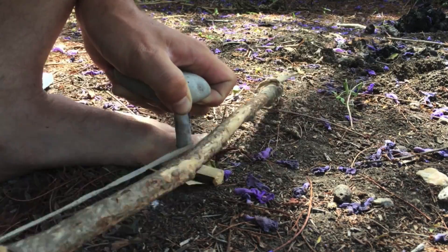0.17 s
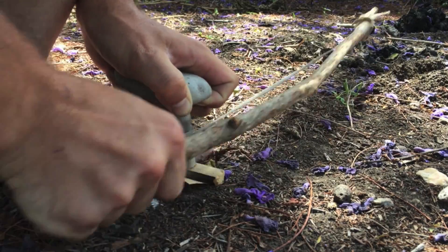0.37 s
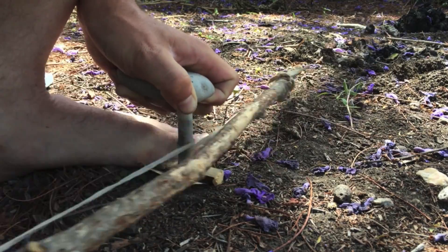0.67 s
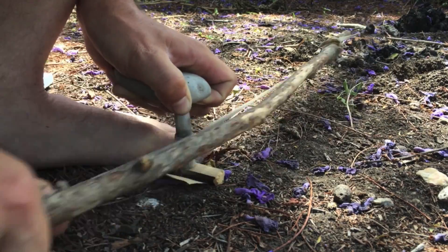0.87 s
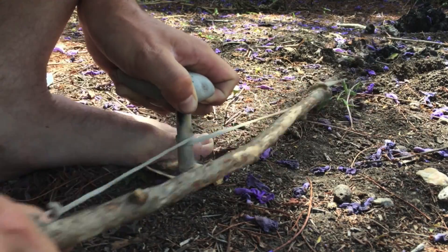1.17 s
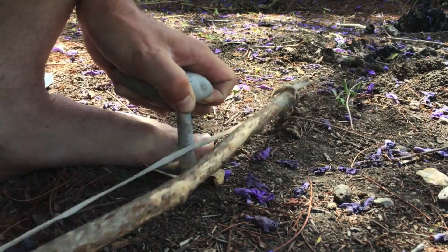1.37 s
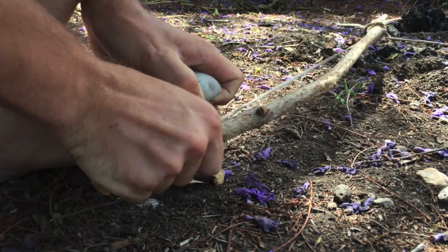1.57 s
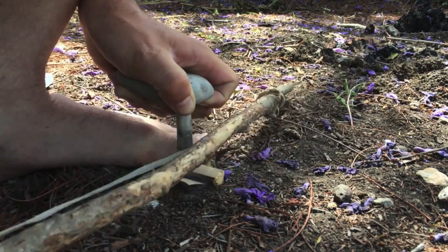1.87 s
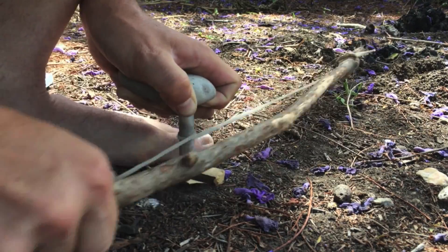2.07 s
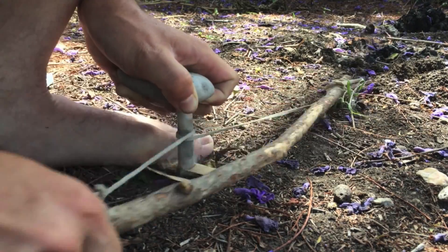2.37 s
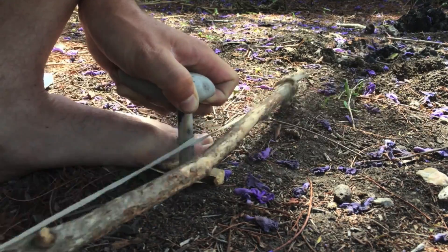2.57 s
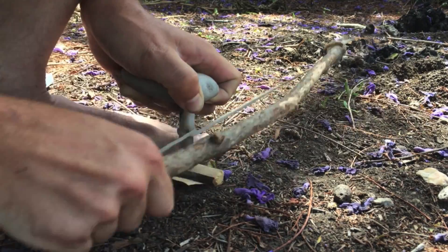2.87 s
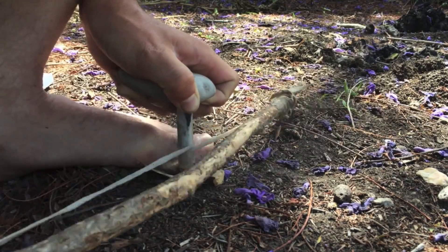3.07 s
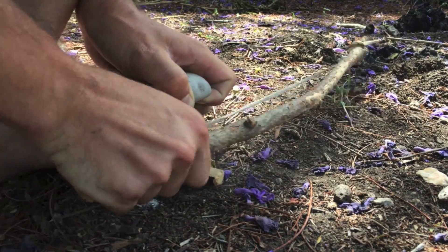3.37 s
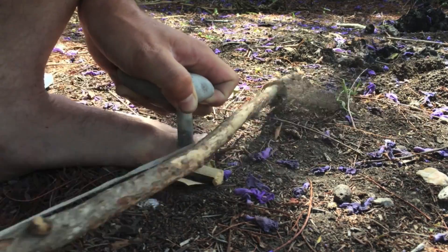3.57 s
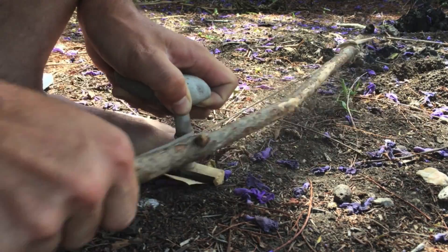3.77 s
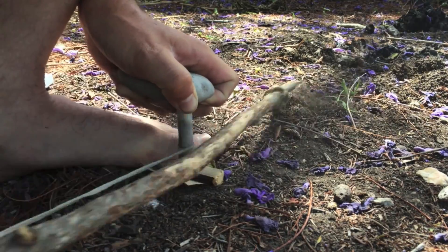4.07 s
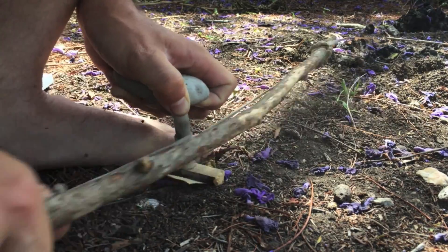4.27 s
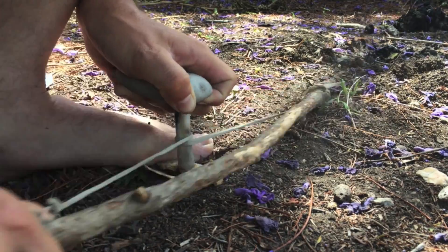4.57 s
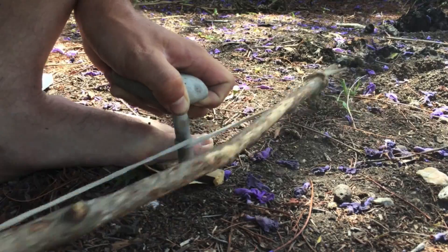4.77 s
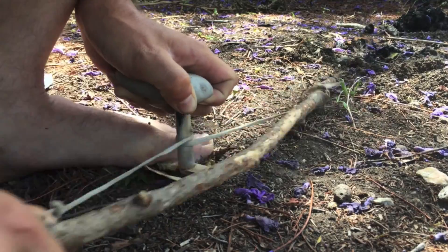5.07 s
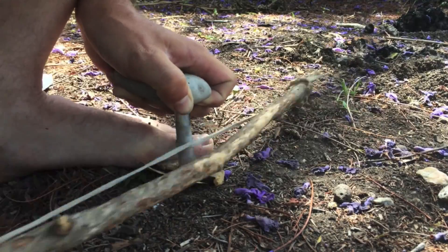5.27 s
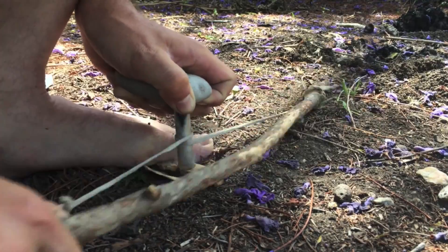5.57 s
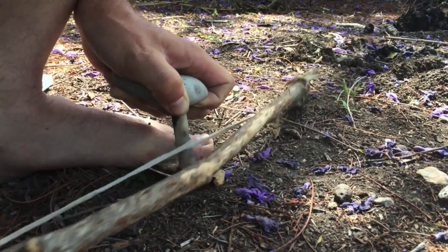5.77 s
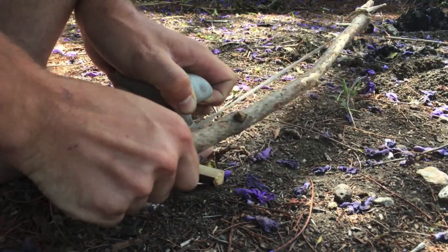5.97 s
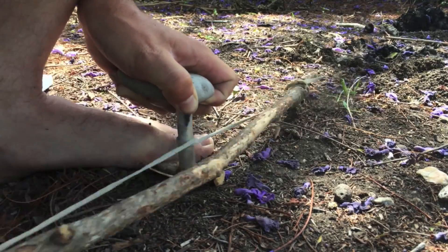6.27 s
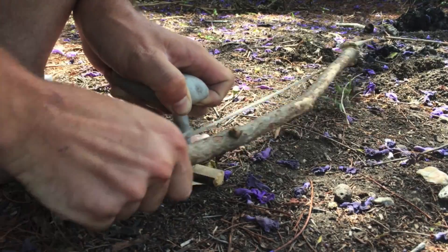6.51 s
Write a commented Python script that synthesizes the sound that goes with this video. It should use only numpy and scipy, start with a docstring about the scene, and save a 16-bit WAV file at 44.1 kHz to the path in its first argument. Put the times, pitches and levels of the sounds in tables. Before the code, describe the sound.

A bow drill spins a wooden spindle in a softwood board, close to the microphone. Fast, even strokes, three or four a second, each give a dry rasp over a low purr or rumble. Grit crunches, the board creaks and the cord ticks now and then. From about halfway, short high squeaks grow louder and more crowded. Behind it is quiet outdoor air with a faint distant hum.

```python
"""Outdoors on bare ground, close to a bow drill spinning its spindle in a softwood board.
Over still air and a distant hum, each stroke rasps in the socket and shakes the board:
a low purr on the pull, a rumble on the push. Grit catches, the board creaks, the cord ticks.
As the socket heats and glazes, the spindle sticks and slips in louder, more crowded squeaks."""
import sys
import numpy as np
from scipy import signal
from scipy.fft import rfft, irfft, next_fast_len
from scipy.io import wavfile

SR = 44100
rng = np.random.default_rng(int(sys.argv[2]) if len(sys.argv) > 2 else 0)


def file_out(sig):
    """Save sig as 16-bit WAV at sys.argv[1]."""
    # one column per channel
    cols = np.atleast_2d(sig).T
    # limit, then scale
    lim = np.clip(cols, -1, 1)
    pcm = np.round(lim * 32767).astype(np.int16)
    wavfile.write(sys.argv[1], SR, pcm)


N = 292824
TIME = np.arange(N) / SR


def from_db(db):
    """Decibels to gain."""
    return 10 ** (np.asarray(db) / 20)


def unit_rms(x):
    """Scale to rms 1."""
    return x / np.sqrt(np.mean(x ** 2) + 1e-20)


def automation(rows):
    """One curve per column from breakpoints (time_s, values...)."""
    times, *columns = np.transpose(sorted(map(tuple, rows)))
    return [np.interp(TIME, times, column) for column in columns]


def eq_gain(spectrum, hz):
    """Gain of a (freq_hz, level_db) curve, read on a log-frequency axis."""
    freqs, db = np.transpose(spectrum)
    return from_db(np.interp(np.log(hz + 1e-3), np.log(freqs), db, left=-90, right=-90))


def drift(rate_hz):
    """Smooth random modulation that moves at about this rate; rms 1."""
    step = 6  # samples per control point
    size = next_fast_len(N // step + 2)
    hz = np.arange(size // 2 + 1) * SR / (step * size)
    slow = irfft(rfft(rng.standard_normal(size)) / (1 + (hz / rate_hz) ** 2) ** 2, size)
    return np.interp(np.arange(N) / step, np.arange(size), unit_rms(slow))


def coloured_noise(spectrum):
    """Noise shaped by an EQ curve; rms 1."""
    size = next_fast_len(N)
    hz = np.arange(size // 2 + 1) * SR / size
    return unit_rms(irfft(rfft(rng.standard_normal(size)) * eq_gain(spectrum, hz), size)[:N])


def resonate(x, hz, width_hz):
    """One resonance with unit gain at its peak."""
    r = np.exp(-np.pi * width_hz / SR)
    feedback = [1, -2 * r * np.cos(2 * np.pi * hz / SR), r * r]
    return signal.lfilter(np.array([1, 0, -1]) * (1 - r * r) / 2, feedback, x)


def band(x, low_hz, high_hz):
    """Gentle band-pass."""
    return signal.sosfilt(signal.butter(2, [low_hz, high_hz], "band", fs=SR, output="sos"), x)


def swell(centre_s, width_s, skirt=0, hold_s=0):
    """Sample indices and shape of a bell envelope, with an optional long skirt and flat top."""
    reach_s = 6 * width_s + hold_s / 2
    at = np.arange(max(int((centre_s - reach_s) * SR), 0), min(int((centre_s + reach_s) * SR), N))
    away = np.maximum(np.abs(TIME[at] - centre_s) - hold_s / 2, 0) / width_s
    return at, (1 - skirt) * .5 ** ((2 * away) ** 2) + skirt * np.exp(-away)


def bursts(spectrum, rows):
    """A bell of coloured noise for each (centre_s, length_s, level_db)."""
    out, noise = np.zeros(N), coloured_noise(spectrum)
    for centre_s, length_s, db in rows:
        at, bell = swell(centre_s, length_s)
        burst = noise[at] * bell
        out[at] += from_db(db) * burst * np.sqrt(np.sum(bell ** 2) / np.sum(burst ** 2))
    return out


def rubbed_mode(hz, width_hz, flutter_db):
    """Uneven friction keeps a mode ringing along a pitch curve, restless in level and phase; rms 1."""
    ringing = drift(width_hz) + 1j * drift(width_hz)
    flutter = from_db(flutter_db * np.tanh(drift(150)))
    return unit_rms(np.real(ringing * flutter * np.exp(2j * np.pi * np.cumsum(hz) / SR)))


# Tone of the still air: freq_hz, level_db
AIR_SPECTRUM = [(15, -32), (25, -12), (50, -4.5), (100, 2.5), (150, -5.5), (260, -11), (510, -16),
                (700, -20.5), (1050, -20.5), (1620, -24.5), (3500, -36), (7100, -37.5), (12800, -40),
                (15500, -62)]
# Fader moves of the distant hum: time_s, level_db
HUM_FADER = [(0, -45.5), (.55, -42.5), (.85, -58), (1.3, -50), (2.3, -56), (3.3, -55), (4.3, -72),
             (6.64, -55)]


def background(air_db=-52, hum_hz=69.7, waver_hz=2.36, waver_db=2.5, hum_trim_db=-4.5):
    """A bed of still air, with a distant low hum that wavers and fades unevenly."""
    pitch_hz = hum_hz + waver_hz * drift(6.3)
    hum = np.sqrt(2) * np.sin(2 * np.pi * np.cumsum(pitch_hz) / SR)
    air = from_db(air_db) * coloured_noise(AIR_SPECTRUM)
    hum_db = automation(HUM_FADER)[0] + hum_trim_db + waver_db * drift(1.9)
    return air + from_db(hum_db) * hum


def outdoors(x, t60_s=0.29, wet_db=-36, predelay_s=.004):
    """Trunks and ground scatter back a faint, dull tail."""
    t = TIME[:SR // 2]
    tail = band(rng.standard_normal(len(t)), low_hz=300, high_hz=4580)
    tail *= from_db(-60 * t / t60_s) * (t > predelay_s)
    return x + from_db(wet_db) * signal.fftconvolve(x, tail / np.sqrt(np.sum(tail ** 2)))[:N]


# Cues for the cord snapping taut: start_s, level_db
CORD_SNAPS = [(0.2798, -53), (0.848, -56), (1.997, -39.5), (2.6237, -51), (2.734, -28), (4.2637, -40),
              (4.7778, -36), (5.7674, -31)]


def cord_ticks(decay_s=0.0031, trim_db=-3):
    """The cord snaps taut on the spindle with a dry tick, mostly as the bow turns round."""
    impulses = np.zeros(N)
    for start_s, db in CORD_SNAPS:
        impulses[int(start_s * SR)] = from_db(db + trim_db)
    envelope = signal.lfilter([1], [1, -np.exp(-1 / (decay_s * SR))], impulses + 1e-18)
    return envelope * unit_rms(band(rng.standard_normal(N), low_hz=900, high_hz=13300))


# Cues for the spindle hitting the socket wall: centre_s, level_db
WALL_KNOCKS = [(.4123, -39), (.4454, -37), (.484, -40), (.946, -32.5), (1.0105, -40), (1.5238, -34),
               (1.5604, -28.5), (1.589, -37.5), (1.6278, -36), (2.452, -40.5), (3.345, -32), (4.907, -35),
               (5.4194, -28.5), (5.913, -32)]
# Dull wooden body of a knock: freq_hz, level_db
KNOCK_SPECTRUM = [(130, -48), (220, -19), (350, 5), (600, -14.5), (900, -15)]


def knocks(length_s=0.005, trim_db=-3.5):
    """The spindle thumps against the wall of its socket, mostly on the push."""
    return bursts(KNOCK_SPECTRUM, [(s, length_s, db + trim_db) for s, db in WALL_KNOCKS])


# Short hollow creaks of the board under load: centre_s, level_db, pitch_hz
BOARD_CREAKS = [(.147, -44, 661), (1.84, -41.5, 704), (2.485, -38.5, 660), (2.521, -39, 681),
                (3.08, -35.5, 1220), (3.869, -41.5, 916), (4.694, -37, 741.6), (5.163, -36.5, 675),
                (5.447, -34, 958), (6.143, -38, 686), (6.206, -38, 710)]


def creaks(length_s=.008, jitter=0.084, trim_db=-3.0):
    """The spindle grabs for a few cycles and rocks the board at a low, unsteady pitch."""
    out, unsteady = np.zeros(N), 1 + jitter * drift(302)
    for centre_s, db, hz in BOARD_CREAKS:
        at, bell = swell(centre_s, length_s)
        tone = np.sqrt(2) * np.sin(2 * np.pi * np.cumsum(hz * unsteady[at]) / SR)
        out[at] += from_db(db + trim_db) * bell * tone
    return out


def fine_grit(push_speed, top_rate_per_s=14, length_s=0.0035, level_db=-36.5, spread_db=2, board_db=-5):
    """Cues for small random catches, far more frequent when the push is fast."""
    tries = 160
    position, chance, softness = rng.random((tries, 3)).T
    times = position * TIME[-1]
    rate_per_s = top_rate_per_s * np.interp(times, TIME, push_speed) ** 5
    caught = chance < rate_per_s * TIME[-1] / tries
    levels_db = level_db - spread_db * (2 * softness - 1)
    return [(s, length_s, db, board_db) for s, db in zip(times[caught], levels_db[caught])]


# Grit catching in the socket: centre_s, length_s, level_db, board_send_db
GRIT_CATCHES = [(.3808, 0.0027, -29.5, 1.5), (.4123, 0.004, -35, -4), (.946, 0.0026, -29, -5),
                (.976, 0.0039, -36, -0.5), (1.19, 0.0021, -34.5, -8), (1.522, 0.01, -32, -10),
                (1.631, 0.0065, -35, -5.5), (1.7715, .0016, -33, -18), (1.8844, 0.0019, -33.5, 1.5),
                (2.0751, .0021, -25, -19), (2.0816, 0.0054, -30, -2), (2.109, 0.0026, -22.5, -7),
                (2.117, 0.0068, -23, -1.5), (2.1467, 0.0012, -22.5, -6), (2.1803, 0.00093, -25.5, -4),
                (2.219, 0.011, -32.5, -8.5), (2.3293, 0.0035, -42.5, -10), (2.4522, 0.0036, -20.5, -1.5),
                (2.5454, 0.0029, -34.5, -18), (3.3118, .004, -28.5, -1), (3.3408, 0.0018, -22.5, -17),
                (3.345, 0.00095, -19.5, 2), (3.5196, .004, -39, -7), (3.8707, .0011, -30, -1),
                (4.3154, .0038, -29, -27), (4.3435, .0041, -29, -20), (4.9084, .0031, -30, -5.5),
                (4.9267, 0.0025, -31, -4), (5.4147, .0017, -19, -13), (5.4194, 0.0029, -21.5, -7.5),
                (5.898, 0.0051, -24.5, -25), (6.1673, .0027, -27, -4.5), (6.4711, 0.0016, -26, -11)]
# Ring of the spindle when it jams or drags: freq_hz, level_db
SPINDLE_SPECTRUM = [(1400, -17), (2000, -2.5), (2300, 9), (2800, -2), (3500, -5), (4500, -12)]


def grit_catches(push_speed, board_db=2.0, spindle_db=0.5, crunch_db=-8.5):
    """Grit jams for a few milliseconds and shakes board and spindle under a bright crunch."""
    board_spectrum = [(500, -65), (850, -5), (1200, 6.5), (1650, 12.5), (2100, -4.5), (3000, -12)]
    crunch_spectrum = [(2800, -9), (3900, -2.0), (6200, 10.5), (8000, 5.0), (15000, -4)]
    cues = list(GRIT_CATCHES) + fine_grit(push_speed)
    jams = [(s, length_s, db) for s, length_s, db, _ in cues]
    jolts = [(s, length_s, db + send_db) for s, length_s, db, send_db in cues]
    board = from_db(board_db) * bursts(board_spectrum, jolts)
    spindle = from_db(spindle_db) * bursts(SPINDLE_SPECTRUM, jams)
    crunch = from_db(crunch_db) * bursts(crunch_spectrum, jams)
    return board + spindle + crunch


# Bow strokes, pull and push in turn: start_s, fastest_s, end_s, rasp_db, judder_db
BOW_STROKES = [(-.013, .13, 0.26, -45, -36.5), (.294, .407, .52, -44.3, -43), (.554, .731, 0.81, -45, -35),
               (.856, .957, 1.094, -44.5, -43.5), (1.108, 1.281, 1.373, -45, -37),
               (1.418, 1.539, 1.67, -44, -46), (1.684, 1.859, 1.968, -45.8, -37),
               (2.012, 2.125, 2.262, -41.5, -45), (2.31, 2.491, 2.58, -46, -40),
               (2.601, 2.755, 2.84, -45, -47), (2.877, 3.027, 3.138, -45.5, -41),
               (3.166, 3.324, 3.429, -43.5, -45), (3.446, 3.593, 3.715, -47.5, -40),
               (3.71, 3.857, 3.94, -45, -48), (3.969, 4.112, 4.25, -47.5, -40.5),
               (4.25, 4.357, 4.495, -42, -44.5), (4.506, 4.679, 4.782, -46.5, -37.5),
               (4.785, 4.883, 5.035, -45, -44), (5.015, 5.163, 5.3, -45.5, -38.5),
               (5.292, 5.43, 5.51, -42, -42.5), (5.525, 5.663, 5.808, -46.5, -39),
               (5.807, 5.909, 6, -41.5, -40.5), (6.054, 6.168, 6.295, -46.5, -41.5),
               (6.285, 6.422, 6.534, -47, -54.5), (6.55, 6.69, 6.83, -47, -44)]


def bow(coast_s=0.00704, reversal_s=0.0101, top_turns_per_s=24, wobble_db=1.5):
    """Each stroke swings up to speed and back. Gives speed, rasp_db, judder_db, pulling (1 or 0)."""
    rasp_power, pull_judder_power, push_judder_power = 1.964, 3.66, 1.9  # amplitude ~ speed ** power
    rasp_floor_db, judder_floor_db = -79, -59  # what remains while the bow turns round
    speed, rasping, shaking, directions = np.zeros(N), np.zeros(N), np.zeros(N), []
    for k, (start_s, fastest_s, end_s, rasp_db, judder_db) in enumerate(BOW_STROKES):
        pull = k % 2 == 0
        directions += [(start_s - reversal_s, not pull), (start_s, pull)]  # a quick crossfade
        start_s, end_s = start_s - coast_s, end_s + coast_s  # the spindle creeps at both ends
        at = slice(max(int(start_s * SR), 0), int(end_s * SR))
        swing = np.sin(np.pi / 2 * np.interp(TIME[at], [start_s, fastest_s, end_s], [0, 1, 0]))
        speed[at] += swing
        rasping[at] += from_db(rasp_db) * swing ** rasp_power
        shaking[at] += from_db(judder_db) * swing ** (pull_judder_power if pull else push_judder_power)
    turns = top_turns_per_s * np.cumsum(speed) / SR
    wobble = from_db(wobble_db * np.sin(2 * np.pi * turns))
    rasp_db = 20 * np.log10(np.hypot(rasping, from_db(rasp_floor_db)))
    judder_db = 20 * np.log10(np.hypot(shaking * wobble, from_db(judder_floor_db)))
    return speed, rasp_db, judder_db, automation(directions)[0]


# Low end of the shaking board, one curve per direction: freq_hz, level_db
PULL_PURR = [(60, -6), (120, -17.5), (170, 5), (210, 5), (280, -5.5), (380, -16.5), (600, -74)]
PUSH_RUMBLE = [(50, -5), (100, -1), (170, -1), (330, -5), (450, -17.5), (700, -20.5)]


def judder(judder_db, pulling, pull_db=-1.5, push_db=1.0):
    """The spindle wobbles and shakes the board: a low purr on the pull, a broader rumble on the push."""
    purr = from_db(pull_db) * pulling * coloured_noise(PULL_PURR)
    rumble = from_db(push_db) * (1 - pulling) * coloured_noise(PUSH_RUMBLE)
    return from_db(judder_db) * (purr + rumble)


def whirr(speed, judder_db, pulling, slow_hz=155, fast_hz=195, trim_db=-10):
    """On the pull the wobble settles into a low note that rises and falls with the bow's speed."""
    note = rubbed_mode(slow_hz + (fast_hz - slow_hz) * speed, width_hz=60, flutter_db=2.5)
    return from_db(judder_db + trim_db) * pulling * note


def fresh_scrape(rasp_db, pulling, pitch_hz=3600, trim_db=-5.0, fade_db_per_s=1.5):
    """A hollow, bright scrape on the pull that fades as the socket glazes."""
    scrape = rubbed_mode(np.full(N, pitch_hz), width_hz=600, flutter_db=14.0)
    return from_db(rasp_db + trim_db - fade_db_per_s * TIME) * pulling * scrape


# Resonances of the softwood board: pitch_hz, width_hz, level_db
BOARD_MODES = [(547, 47, -8.5), (716, 210, -15), (1267, 110, -8.5)]


def board_groan(wander=.04):
    """The rubbed board groans, its modes shifting together with the load."""
    load = 1 + wander * drift(8)
    return sum(from_db(db) * rubbed_mode(hz * load, width_hz, flutter_db=-0.5)
               for hz, width_hz, db in BOARD_MODES)


# Tone of wood grinding on wood, one curve per direction: freq_hz, level_db
PULL_RASP_SPECTRUM = [(220, -44), (380, -3), (458, -6.5), (535, -4.5), (729, -2), (1030, -6), (1270, -3.5),
                      (1910, -4.5), (2600, 0.5), (5150, -9), (6210, -6.5), (7250, -9.5), (11900, -11),
                      (14300, -14.5), (15500, -19)]
PUSH_RASP_SPECTRUM = [(220, -36), (380, -12), (741, -11.5), (1030, -10.5), (1630, -3.5), (1970, -2.5),
                      (2300, -2), (2900, -3.5), (4480, -8), (5570, -10.5), (6210, -9), (7030, -8),
                      (11700, -9), (14100, -12), (15500, -19)]


def rasp(rasp_db, pulling, pivot_db=-45, rub_growth=0.92, crossover_hz=1900, trim_db=-0.93):
    """Wood fibres tear in dense grains; the hiss grows faster with speed than the board's lower rub."""
    grain_db, uneven_db, clump_db = 1.0, 2.04, 3.5  # depths of the level flicker, fast to slow
    pull_pressure_db, push_pressure_db = -2.5, 3  # the spindle bears harder on the push
    grains = unit_rms(rng.standard_normal(N) * from_db(grain_db * drift(800) + uneven_db * drift(110)))
    clumps = unit_rms(from_db(clump_db * drift(72)))
    pressure_db = pulling * pull_pressure_db + (1 - pulling) * push_pressure_db
    rub_gain = from_db(pivot_db + rub_growth * (rasp_db - pivot_db) + pressure_db)
    hz = np.arange(N // 2 + 1) * SR / N
    lows = 1 / (1 + (hz / crossover_hz) ** 4)
    grinding = np.zeros(N)
    for spectrum, share in ((PULL_RASP_SPECTRUM, pulling), (PUSH_RASP_SPECTRUM, 1 - pulling)):
        colour = eq_gain(spectrum, hz)
        colour /= np.sqrt(np.mean(colour ** 2 * (hz > 8500)))  # equal top-end power both ways
        hiss = rfft(grains * share * from_db(rasp_db)) * (1 - lows)
        rub = rfft(grains * clumps * share * rub_gain) * lows
        grinding += irfft((hiss + rub) * colour, N)
    return from_db(trim_db) * (grinding + pulling * rub_gain * board_groan())


# The glazing socket sings louder and settles in pitch: time_s, level_db, pull_pitch_hz, push_pitch_hz
SOCKET_GLAZE = [(0, -16, 3050, 2740), (2.2, -8, 3270, 2514), (2.9, 3, 2770, 2423), (4.2, 0.5, 2570, 2420),
                (6.64, 3.5, 2450, 2420)]


def socket_song(rasp_db, pulling, main_trim_db=-0.5, upper_hz=6300, upper_db=-9):
    """Friction keeps the spindle's modes ringing in flurries, just short of a squeak."""
    glaze_db, pull_hz, push_hz = automation(SOCKET_GLAZE)
    pitch_hz = pulling * pull_hz + (1 - pulling) * push_hz
    main = rubbed_mode(pitch_hz, width_hz=420, flutter_db=16.0)
    upper = rubbed_mode(upper_hz * (1 + 0.018 * drift(9.1)), width_hz=330, flutter_db=26.0)
    return from_db(rasp_db) * (from_db(glaze_db + main_trim_db) * main + from_db(upper_db) * upper)


def through_spindle(x, mode_hz=6400, width_hz=700, send_db=-1.0):
    """The spindle's upper mode lifts the overtones that pass through it."""
    return x + from_db(send_db) * resonate(resonate(x, mode_hz, width_hz), mode_hz, width_hz)


def dragging(squeak_cues, length_s=0.019, level_db=-43, growth=0.33, pivot_db=-15, threshold_db=-25):
    """Around each louder squeak the spindle drags harder and scrapes."""
    scrapes = [(s, length_s, level_db + growth * (db - pivot_db))
               for s, _, db, *_ in squeak_cues if db > threshold_db]
    return bursts(SPINDLE_SPECTRUM, scrapes)


def chatter(first_s=6.4045, period_s=.0164, length_s=.0028, first_db=-7, loss_db=1.5, count=4):
    """Squeak cues for the last squeal breaking into an even run of harsh, weakening slips."""
    pitch_hz, octave_db, harsh_db = 2148, -11.5, -13
    return [(first_s + k * period_s, length_s, first_db - k * loss_db, pitch_hz, octave_db, harsh_db)
            for k in range(count)]


# Stick-slip squeaks of the spindle: centre_s, length_s, level_db, pitch_hz, octave_db, harsh_db
SQUEAK_CUES = [(1.4761, .003, -13, 2582, -10.5, -12), (2.6926, .0055, -21.5, 2473, -26, -26),
               (2.7678, .0015, -23, 2174, -7, -3), (2.9344, .0068, -12.5, 2434, -19.5, -25),
               (3.2097, .0032, -26.5, 2438, -21, -21), (3.413, .007, -32, 2140, -32, -35),
               (3.7826, .0039, -21, 2452, -25, -28), (3.7962, .0024, -22.5, 2289, -25, -24),
               (4.3744, .0023, -23.5, 2450, -19, -12), (4.4023, .0029, -22, 2400, -14, -18),
               (4.4285, 0.0077, -14, 2440, -5, -16), (4.4385, 0.003, -5, 2310, -11.5, -28),
               (4.4468, 0.0063, -8.5, 2375, -12.5, -25), (4.8285, .008, -27, 2407, -29, -16),
               (4.8557, .0032, -12, 2451, -17, -33), (4.866, .0037, -11.5, 2340, -18, -27),
               (4.8941, .0022, -18.5, 2146, -29, -23), (4.9586, .0019, -21, 2339, -31, -33),
               (5.0005, .009, -30, 2038, -21, -33), (5.069, .0023, -25.5, 2343, -30, -29),
               (5.3368, .0077, -16, 2515, -28, -27), (5.378, .0023, -7, 2292, -13.5, -19),
               (5.4363, .0016, -17.5, 2237, -14, -21), (5.4615, .0023, -10, 2283, -13.5, -32),
               (5.4903, .0086, -13, 2457, -28, -40), (5.5028, .006, -20.5, 2425, -29, -43),
               (5.5814, .0051, -26.5, 2530, -34, -19), (5.8544, .0047, -7.5, 2254, -13.5, -29),
               (5.9211, .0038, -23, 2305, -21, -7), (5.9284, .003, -16.5, 2472, -19, -16),
               (5.9653, .0041, -10.5, 2189, -20.5, -36), (5.9906, .0051, -8.5, 2424, -14, -21),
               (5.997, .004, -19.5, 2754, -17, -8), (6.3607, .0085, -5.5, 2270, -11, -26),
               (6.3725, .014, -9, 2335, -16, -32), (6.3865, .008, -8.5, 2320, -15.5, -34),
               (6.53, .007, -36, 1998, -13, -17)]


def squeaks(pitch_lift=0.073, jitter=0.0227, edge_s=.007, third_db=-9, scratch_db=-6, trim_db=-0.02):
    """Stick-slip tones swell and die; the pitch sags and overtones grow as the spindle grips harder."""
    power, weight, weighted = np.zeros(N), np.full(N, 1e-12), np.zeros((4, N))
    for centre_s, length_s, db, hz, octave_db, harsh_db in list(SQUEAK_CUES) + chatter():
        width_s = min(length_s, edge_s)  # longer squeaks hold between rise and fall
        at, bell = swell(centre_s, width_s, skirt=0.1206, hold_s=length_s - width_s)
        envelope = from_db(db) * bell
        power[at] += envelope ** 2
        weight[at] += envelope
        weighted[:, at] += np.outer([from_db(db), hz, from_db(octave_db), from_db(harsh_db)], envelope)
    peak, hz, octave, harsh = weighted / weight  # overlapping squeaks blend into one voice
    level = np.sqrt(power) * from_db(.5 * drift(700))
    grip = np.clip(level / (peak + 1e-9), 0, 1)
    pitch_hz = hz * (1 + pitch_lift * (1 - grip) + jitter * drift(900))
    phase = 2 * np.pi * np.cumsum(pitch_hz) / SR
    overtones = octave * (np.cos(2 * phase) + from_db(third_db) * np.sin(3 * phase))
    for harmonic, db in ((4, -7), (5, -13), (6, -19)):
        overtones += harsh * from_db(db) * np.sin(harmonic * phase)
    puffs = rng.standard_normal(N) * (1 + np.sin(phase)) ** 2  # every slip throws off a puff of noise
    scratch = from_db(scratch_db) * harsh * unit_rms(band(puffs, low_hz=1310, high_hz=7900))
    return from_db(trim_db) * level * (np.cos(phase) + np.sqrt(grip) * overtones + scratch)


def scene():
    """Mono mix: friction and judder ride the bow, with cued accents on top and the air bed beneath."""
    speed, rasp_db, judder_db, pulling = bow()
    push_speed = speed * (1 - pulling)
    sliding = rasp(rasp_db, pulling) + socket_song(rasp_db, pulling) + fresh_scrape(rasp_db, pulling)
    shaking = judder(judder_db, pulling) + whirr(speed, judder_db, pulling) + knocks()
    sticking = through_spindle(squeaks()) + dragging(SQUEAK_CUES) + grit_catches(push_speed) + creaks()
    drill = sliding + shaking + sticking + cord_ticks()
    return (outdoors(drill) + background())[None]


def record(dry, cutoff_hz=15600):
    """A steep high cut on the whole mix."""
    return signal.sosfilt(signal.ellip(10, .2, 80, cutoff_hz, fs=SR, output="sos"), dry)


dry = scene()
out = record(dry)
file_out(out)
```